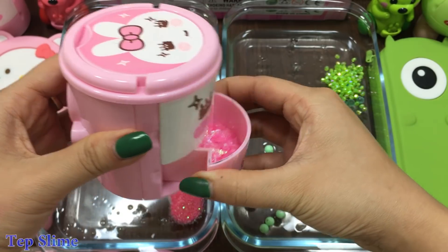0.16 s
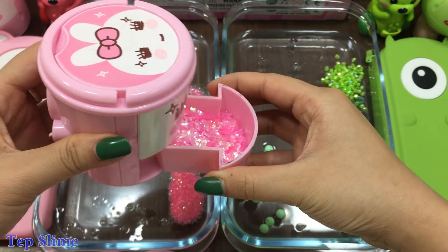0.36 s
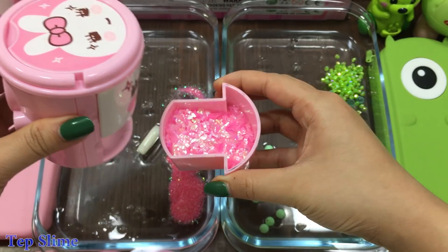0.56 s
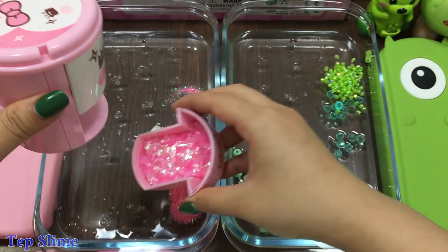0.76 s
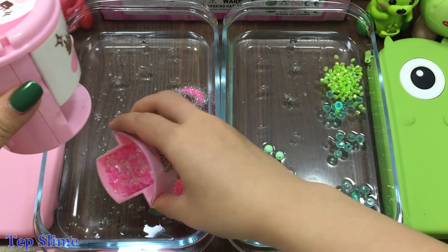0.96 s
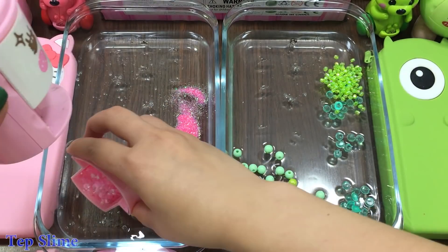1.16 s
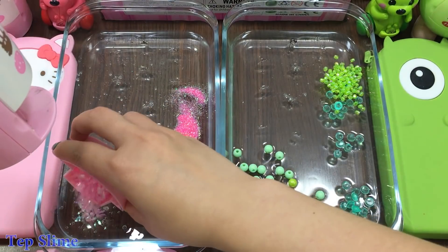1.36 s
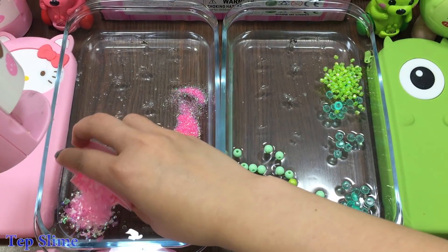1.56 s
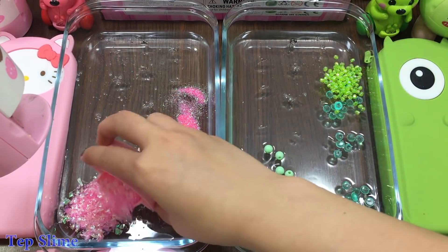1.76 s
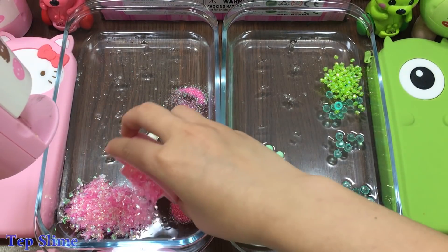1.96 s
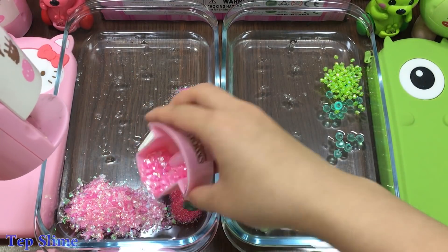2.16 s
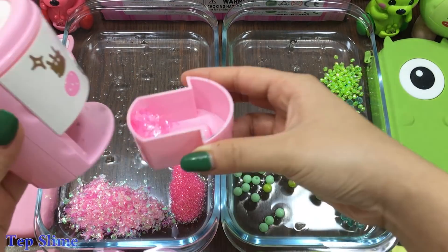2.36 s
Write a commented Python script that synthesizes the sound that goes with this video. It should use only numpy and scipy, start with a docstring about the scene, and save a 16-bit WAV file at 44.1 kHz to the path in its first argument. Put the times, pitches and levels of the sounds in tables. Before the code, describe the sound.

Close up in a lively room, a hard plastic drawer is pulled out with a sharp snap and a second clack, then near quiet, a few tiny ticks, and soft surges of dry flakes sliding into glass.

```python
"""A small plastic drawer of glitter is pulled from a toy dispenser, close to the microphone in a live room.
It scrapes as a stream of tiny slips, and snaps past its catch and clacks free as short modes and cracks.
The flakes shiver and rustle as dense grains, then are tipped into a glass dish with a faint hiss;
a few separate bursts tick. Wavering low tones and shaped noise lie behind as hum and room air."""
import sys
import numpy as np
from scipy import signal
from scipy.fft import rfft, irfft, next_fast_len
from scipy.io import wavfile
from scipy.ndimage import map_coordinates

SR = 44100
rng = np.random.default_rng(int(sys.argv[2]) if len(sys.argv) > 2 else 0)


def wrap_up_sound(samples):
    """Save the sound to the file named by the first command line argument, as 16-bit audio."""
    columns = np.atleast_2d(samples).T
    # keep every value between -1 and 1, then stretch to whole-number steps
    tamed = np.clip(columns, -1, 1)
    steps = np.round(tamed * 32767).astype(np.int16)
    wavfile.write(sys.argv[1], SR, steps)


N = 105840  # samples

# low hum tones: (frequency [Hz], mean level [dB])
HUM_TONES = [(64, -62), (93.5, -63.5), (184, -75)]
# spectrum of the room air: (frequency [Hz], relative level [dB])
AIR_COLOUR = [(20, -46.5), (38, -17), (50, -11), (62, -5.5), (78, -14), (108, -7), (135, -18.5), (185, -15),
              (220, -19.5), (320, -23), (450, -27.5), (600, -31), (850, -33.5), (2500, -36), (3300, -37.5),
              (16000, -42)]
AIR_DB = -61.5

# modes of the drawer still in its housing: (frequency [Hz], level [dB], decay T60 [s])
HOUSED_DRAWER_MODES = [(1035, -9, 0.019), (1263, -16.5, 0.018), (1690, -7, .019), (2110, -22, .014),
                       (2454, -11.5, 0.023), (3490, -17, 0.0076), (4157, -20, .008), (4960, -18, .009),
                       (6230, 4, .0065), (6930, 1.5, .0065), (7800, -12.5, .011), (8880, -10.5, 0.0084),
                       (9410, -15.5, 0.011), (10500, -14.5, 0.005), (12460, -19, 0.016), (13940, -20, .01)]
# modes of the drawer as it comes free: (frequency [Hz], level [dB], decay T60 [s])
FREE_DRAWER_MODES = [(1112, -27, 0.06), (1395, -10.5, .021), (1757, -16.5, .023), (1857, -20, 0.02),
                     (2617, -16, .016), (2730, -19, 0.011), (3440, -28, .016), (4880, -29, 0.032),
                     (5920, -24.5, 0.018), (6300, -14.5, 0.011), (7095, -21.5, 0.021), (9775, -39, 0.057),
                     (13035, -32, 0.0091)]
# spectrum of the crack of a plastic blow: (frequency [Hz], gain [dB])
PLASTIC_CRACK_COLOUR = [(250, -10), (600, -13), (800, -10), (1100, 3), (2000, 3), (3000, 0), (5000, 0.5),
                        (7500, -3), (10000, -6), (13000, -9), (16000, -10.5)]
CRACK_T60_S, RADIATES_ABOVE_HZ = 0.014, 750
BUILD_CYCLES = 2.3  # a mode's build-up time, in its own cycles
RING_IN_ROOM_DB = -3  # heard from all sides, the modes stand out less
THUMP_HZ, THUMP_T60_S, THUMP_DB = 333, 0.016, -51  # the hand-held body, level relative to the crack

GRIP_S, GRIP_DB, GRIP_DULL_HZ, GRIP_ROOM_DB = 0.0036, -18.5, 2600, -11.5
SNAP_S, SNAP_DB, SNAP_CRACK_DB, SNAP_ROOM_DB = 0.2413, -0.5, 11.5, -8.5
LEAD_S, LEAD_DB = 0.0045, -25  # the catch slips a little before it lets go
REBOUND_S, REBOUND_DB, REBOUND_DULL_HZ = 0.003, -12, 3000  # the drawer wall knocks once more, softly
CLACK_S, CLACK_DB, CLACK_CRACK_DB, CLACK_ROOM_DB = 0.5499, 1.5, 2, -9.5
CLACK_EDGE_DB, CLACK_EDGE_HZ = -8, 7900  # the bright click of the rim leaving the rail
RIM_HZ, RIM_DB, RIM_T60_S = 9775, -61, 0.6  # a thin ring that the clack leaves behind

# scraping up to the catch: (time [s], level [dB])
TIGHT_SCRAPE = [(.104, -86), (.114, -65), (.131, -62), (.137, -55), (.16, -56.5), (.2, -48), (.226, -53.5),
                (.238, -39.5), (.25, -67.5)]
# scraping after the catch: (time [s], level [dB])
LOOSE_SCRAPE = [(.36, -65), (.44, -64.5), (.48, -49.5), (.505, -49.5), (.519, -44), (.532, -48.5),
                (.544, -52), (.555, -56.5)]
# spectrum of the scrape up to the catch: (frequency [Hz], relative level [dB])
TIGHT_SCRAPE_COLOUR = [(300, -24.5), (750, -20.5), (1020, 0.5), (1200, 0), (1700, -17.5), (2600, -12),
                       (3300, -19), (5400, -19), (6500, -11), (7800, -20.5), (10000, -19), (15500, -28)]
# spectrum of the scrape after the catch: (frequency [Hz], relative level [dB])
LOOSE_SCRAPE_COLOUR = [(300, -11.5), (780, -30), (1130, 2), (1450, -9.5), (1800, -2.5), (2200, 2),
                       (2700, -6.5), (3200, -19.5), (5500, -13), (6500, -17), (9000, -24), (15500, -30.5)]
SLIPS_PER_S = 1800

# flakes shifting in the moving drawer: (time [s], level [dB])
FLAKE_RUSTLE = [(.105, -85), (.115, -67), (.22, -62.5), (.42, -62.5), (.51, -61), (.6, -68.5), (.7, -81)]
# flakes sliding into the dish: (time [s], level [dB])
DISH_POUR = [(1.2, -86), (1.38, -68), (1.47, -68), (1.5, -63.5), (1.615, -57.5), (1.655, -65), (1.72, -60),
             (1.79, -59.5), (1.845, -67), (1.885, -64.5), (1.91, -60), (1.955, -61), (2.04, -67.5),
             (2.14, -68.5), (2.22, -79.5), (2.4, -76)]
# spectrum of sliding flakes: (frequency [Hz], relative level [dB])
SLIDING_COLOUR = [(800, -18), (2800, -15), (3900, -2.5), (5000, -8.5), (6800, 0.5), (8500, -4),
                  (10200, 1.5), (11500, -4), (13300, 2.5), (15800, -4.5)]
# spectrum of flakes jumping at the snap: (frequency [Hz], relative level [dB])
SHIVERING_COLOUR = [(300, -25.5), (800, -18), (1800, 1), (2500, 1.5), (3300, -3.5), (5400, -4), (6500, 3.5),
                    (9000, 1), (15500, -6.5)]
FLAKES_PER_S = 5000
SHIVER_DB, SHIVER_RISE_S, SHIVER_T60_S = -33.5, 0.012, 0.36

# single hard flakes landing: (time [s], strength [dB])
FLAKE_TICKS = [(.3465, -7), (1.013, -45), (1.236, -46), (1.3238, -29), (1.3503, -24), (1.39, -40.5),
               (2.345, -45), (2.383, -47)]
# spectrum of a landing flake: (frequency [Hz], gain [dB])
FLAKE_TICK_COLOUR = [(500, -43.5), (2000, -21.5), (2800, -11), (6000, -13), (8500, -18), (9800, 3.5),
                     (11500, -4.5), (13500, 1), (16000, -6.5)]
TICK_T60_S, TICK_ROOM_DB = 0.01, -10.5

# decay of the room: (frequency [Hz], decay T60 [s])
ROOM_DECAY = [(300, .4), (1500, 0.59), (3000, 0.64), (6500, 0.61), (10000, .45), (15000, 0.12)]
# spectrum of the room's answer: (frequency [Hz], gain [dB])
ROOM_TAIL_COLOUR = [(300, 0), (1000, -4.5), (2000, 0.5), (3500, -3), (5000, -5.5), (6500, -7.5), (9000, -3),
                    (15000, -3.5)]
EARLY_S, EARLY_T60_S, EARLY_DB = 0.003, 0.07, -18  # reflections from the dishes and the table
TOP_HZ = 15850  # the recorder's band limit


def amp(db):
    """Decibels to gain."""
    return 10 ** (np.asarray(db) / 20)


def unit(x):
    """Scale to rms 1."""
    return x / np.sqrt(np.mean(x ** 2) + 1e-20)


def along(points, hz):
    """Interpolate (Hz, value) points on a log frequency axis."""
    f, value = np.transpose(points)
    return np.interp(np.log(hz + 1), np.log(f + 1), value)


def swell(rows):
    """Gain per sample from (s, dB) rows, silent outside them."""
    s, db = np.transpose(rows)
    return amp(np.interp(np.arange(N) / SR, s, db, left=-140, right=-140))


def wobble(rate):
    """A smooth random curve, rate knots a second."""
    return map_coordinates(rng.standard_normal(400), [np.arange(N) * rate / SR], mode="wrap")


def coloured(x, points):
    """Filter x causally to a (Hz, dB) shape, with minimum phase from the folded cepstrum."""
    m = 2 * next_fast_len(N)
    gain = amp(along(points, np.fft.rfftfreq(m, 1 / SR)))
    cepstrum = irfft(np.log(gain), m)
    cepstrum[1:m // 2] *= 2
    cepstrum[m // 2 + 1:] = 0
    response = np.exp(rfft(cepstrum))
    return irfft(rfft(x, m) * response, m)[:N]


def butter(x, hz, kind, order):
    """Causal high-pass or low-pass."""
    sos = signal.butter(order, min(hz, SR / 2 - 1), kind, fs=SR, output="sos")
    return signal.sosfilt(sos, x)


def at(s, x):
    """Place a short sound at time s."""
    return np.pad(x, (max(round(s * SR), 0), N))[:N]


def fade(t, t60):
    """Exponential decay, 60 dB down after t60."""
    return np.exp(-np.log(1000) * t / t60)


def decaying_sine(t, hz, t60):
    """A sine that dies away exponentially."""
    return fade(t, t60) * np.sin(2 * np.pi * hz * t)


def burst(t60):
    """A short noise burst with a nearly even spectrum and unit energy."""
    t = np.arange(SR // 20) / SR
    x = fade(t, t60) * rng.standard_normal(len(t))
    for _ in range(4):
        flat = irfft(np.exp(1j * np.angle(rfft(x))), len(t))
        x = flat * fade(t, 10 * t60)
    return x / np.linalg.norm(x)


def grains(rate, colour, spread_db):
    """Dense tiny contacts of random sign and uneven size, coloured, rms 1."""
    struck = rng.random(N) < rate / SR
    sign = rng.choice([-1, 1], N)
    size = amp(spread_db * rng.standard_normal(N))
    return unit(coloured(struck * sign * size, colour))


def room(x):
    """The room's diffuse answer: a noise tail that decays at its own pace in each band."""
    hz, t, z = signal.stft(rng.standard_normal(SR), SR, nperseg=256)
    decay = fade(t, along(ROOM_DECAY, hz)[:, None])
    tail = signal.istft(z * decay, SR, nperseg=256)[1]
    delayed = at(0.0032, tail / np.linalg.norm(tail))
    return signal.fftconvolve(x, coloured(delayed, ROOM_TAIL_COLOUR))[:N]


def in_room(x, room_db):
    """The direct sound plus the room."""
    return x + amp(room_db) * room(x)


def near_walls(x):
    """The direct sound plus a quick decaying scatter off nearby surfaces."""
    t = np.arange(SR // 16) / SR
    scatter = fade(t, EARLY_T60_S) * rng.standard_normal(len(t))
    echoes = signal.fftconvolve(x, scatter / np.linalg.norm(scatter))
    return x + amp(EARLY_DB) * at(EARLY_S, echoes)


def plastic(modes, crack_db, room_db):
    """One blow on thin plastic: short modes, a crack and a weak thump; the small walls radiate little bass."""
    t = np.arange(SR // 8) / SR
    ring = np.zeros(len(t))
    for k, (hz, db, t60) in enumerate(modes):
        build_up = 1 - np.exp(-t * hz / BUILD_CYCLES)
        ring += (-1) ** k * amp(db) * build_up * decaying_sine(t, hz, t60)
    ring = at(0, ring)
    crack = amp(crack_db) * coloured(at(0, burst(CRACK_T60_S)), PLASTIC_CRACK_COLOUR)
    # the room answers a single coloured pulse in place of the crack's noise burst
    pulse = amp(crack_db) * coloured(at(0, np.ones(1)), PLASTIC_CRACK_COLOUR)
    thump = at(0, amp(crack_db + THUMP_DB) * decaying_sine(t, THUMP_HZ, THUMP_T60_S))
    reverb = amp(RING_IN_ROOM_DB) * room(ring) + room(pulse)
    sound = near_walls(ring + crack) + amp(room_db) * reverb
    return thump + butter(sound, RADIATES_ABOVE_HZ, "highpass", order=2)


def background():
    """Low tones wavering in level and phase, over noise shaped as the air of the room."""
    t = np.arange(N) / SR
    hum = np.zeros(N)
    for hz, db in HUM_TONES:
        level = amp(db + 2.5 * wobble(9)) * np.sqrt(2)  # the root makes the level rms
        hum += level * np.sin(2 * np.pi * hz * t + 1.2 * wobble(8.7))
    air = amp(AIR_DB) * unit(coloured(rng.standard_normal(N), AIR_COLOUR))
    return hum + air


def grip_knock():
    """A dull knock of the grip: a plastic blow with its treble cut."""
    blow = amp(GRIP_DB) * plastic(FREE_DRAWER_MODES, crack_db=11.5, room_db=GRIP_ROOM_DB)
    return at(GRIP_S, butter(blow, GRIP_DULL_HZ, "lowpass", order=3))


def scrape():
    """Tiny slips of the drawer on its rails; the ring is higher once it is partly out."""
    tight = swell(TIGHT_SCRAPE) * grains(SLIPS_PER_S, TIGHT_SCRAPE_COLOUR, spread_db=0.5)
    loose = swell(LOOSE_SCRAPE) * grains(SLIPS_PER_S, LOOSE_SCRAPE_COLOUR, spread_db=1.5)
    return in_room(tight + loose, room_db=-6)


def sliding_flakes():
    """Many small flake contacts: a rustle in the moving drawer, then three surges into the dish."""
    level = swell(FLAKE_RUSTLE) + swell(DISH_POUR)
    return in_room(level * grains(FLAKES_PER_S, SLIDING_COLOUR, spread_db=2.5), room_db=-6)


def catch_snap():
    """The catch slips faintly, lets go with a plastic blow, and the drawer wall rebounds dully."""
    catch = plastic(HOUSED_DRAWER_MODES, SNAP_CRACK_DB, SNAP_ROOM_DB)
    slip = at(SNAP_S - LEAD_S, amp(LEAD_DB) * catch)
    rebound = at(REBOUND_S, amp(REBOUND_DB) * butter(catch, REBOUND_DULL_HZ, "lowpass", order=2))
    return slip + at(SNAP_S, amp(SNAP_DB) * catch + rebound)


def shivering_flakes():
    """Flakes jump in the drawer at the snap, and their contacts die away."""
    t = np.maximum(np.arange(N) / SR - SNAP_S, 0)
    level = amp(SHIVER_DB) * (1 - np.exp(-t / SHIVER_RISE_S)) * fade(t, SHIVER_T60_S)
    return level * grains(FLAKES_PER_S, SHIVERING_COLOUR, spread_db=2.0)


def ticks():
    """Single flakes click brightly: short coloured bursts in the room."""
    hits = sum(at(s, amp(db) * burst(TICK_T60_S)) for s, db in FLAKE_TICKS)
    return in_room(coloured(hits, FLAKE_TICK_COLOUR), TICK_ROOM_DB)


def clack():
    """The drawer comes free: a plastic blow, a bright edge click and a thin lasting ring."""
    t = np.arange(SR) / SR
    blow = amp(CLACK_DB) * plastic(FREE_DRAWER_MODES, CLACK_CRACK_DB, CLACK_ROOM_DB)
    edge = amp(CLACK_EDGE_DB) * butter(at(0, burst(0.004)), CLACK_EDGE_HZ, "highpass", order=1)
    rim = at(0, amp(RIM_DB) * decaying_sine(t, RIM_HZ, RIM_T60_S))
    return at(CLACK_S, blow + in_room(edge, room_db=-12) + rim)


def scene():
    """All sources at one close microphone."""
    drawer = grip_knock() + scrape() + catch_snap() + clack()
    flakes = sliding_flakes() + shivering_flakes() + ticks()
    return (background() + drawer + flakes)[None]


def record(dry):
    """The recorder clips at full scale, then keeps nothing above its band limit."""
    m = next_fast_len(N + SR // 2)
    in_band = np.fft.rfftfreq(m, 1 / SR) < TOP_HZ
    return irfft(rfft(np.clip(dry, -1, 1), m) * in_band, m)[..., :N]


dry = scene()
out = record(dry)
wrap_up_sound(out)
```